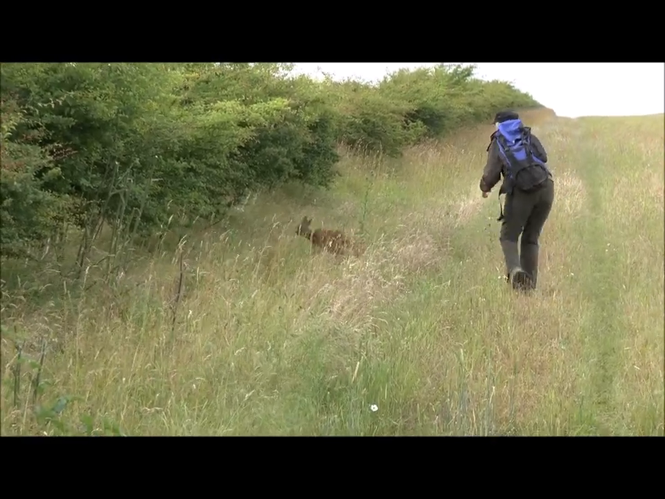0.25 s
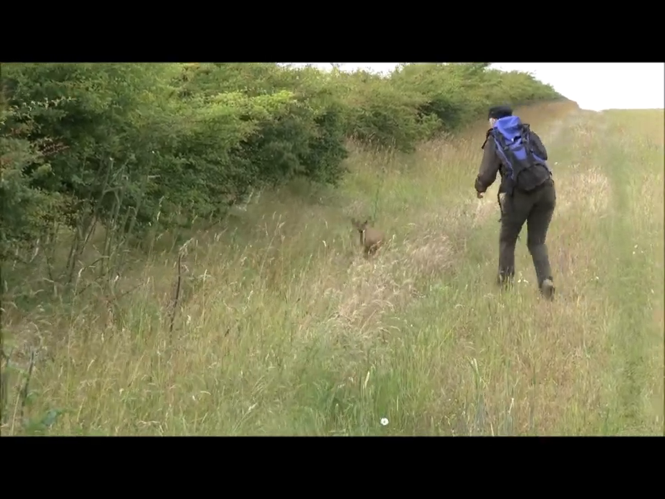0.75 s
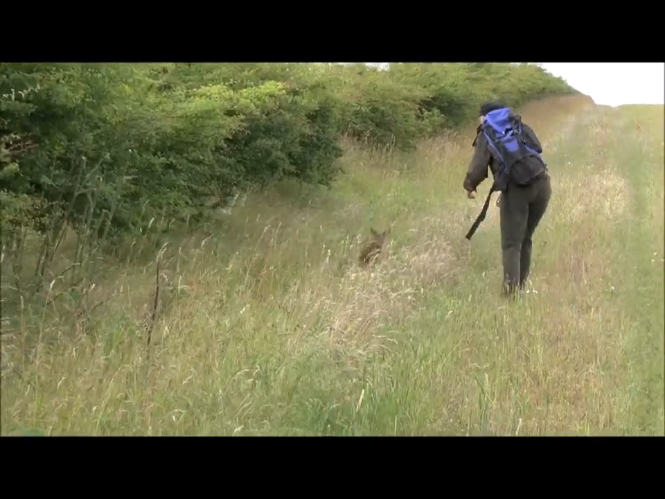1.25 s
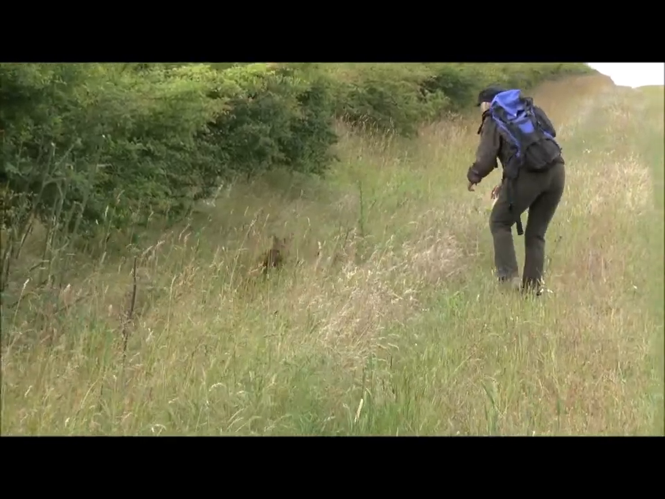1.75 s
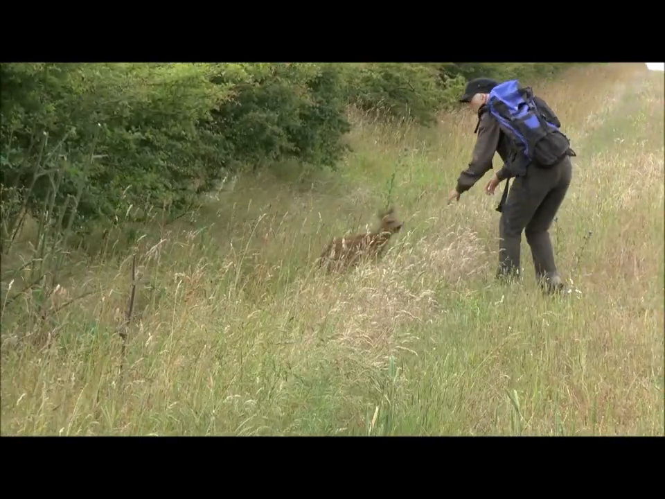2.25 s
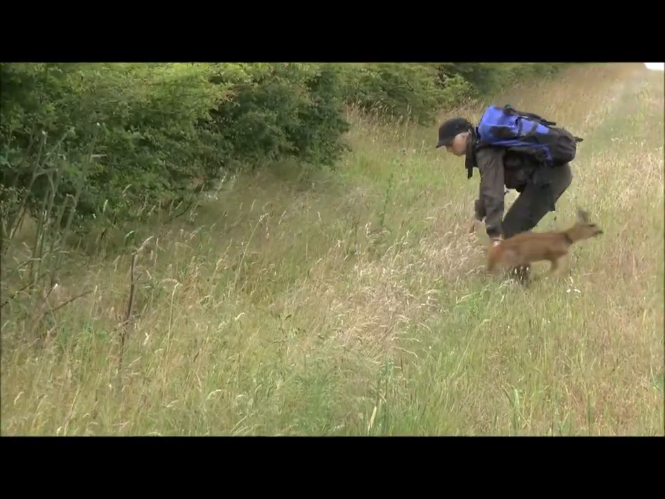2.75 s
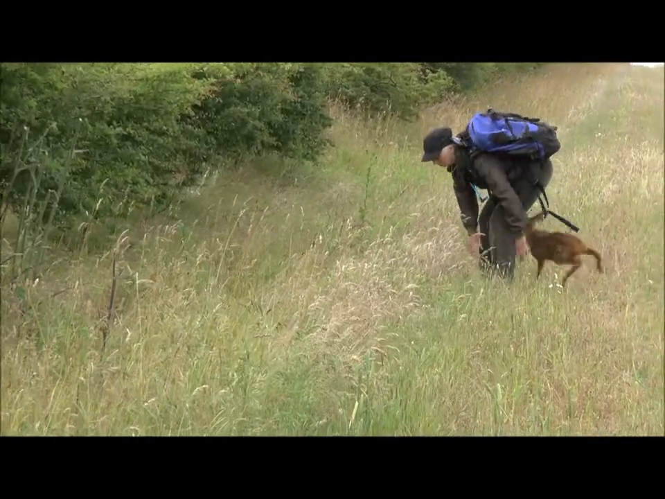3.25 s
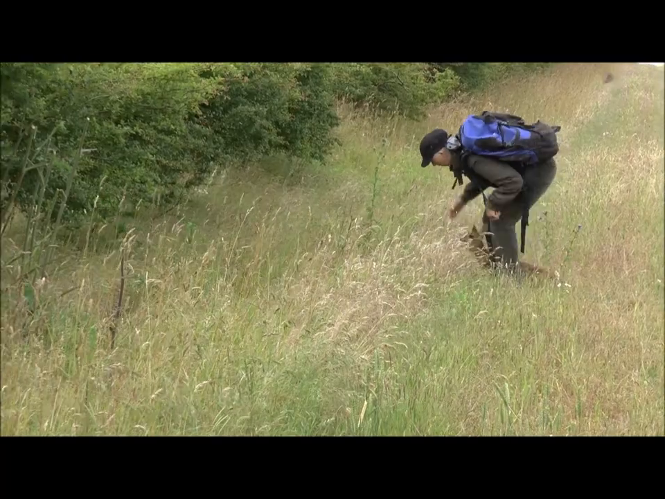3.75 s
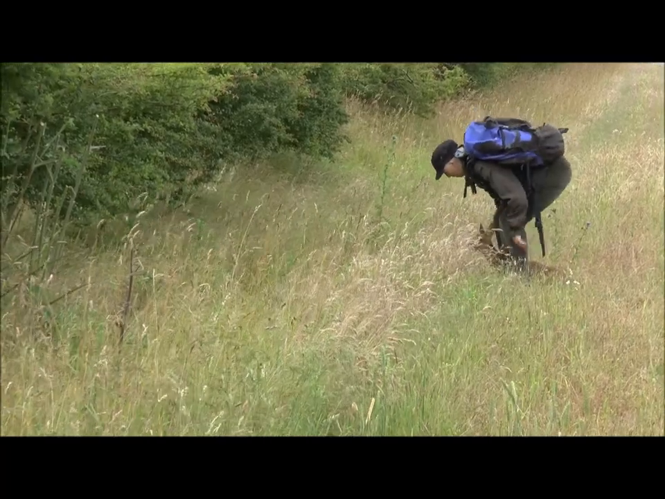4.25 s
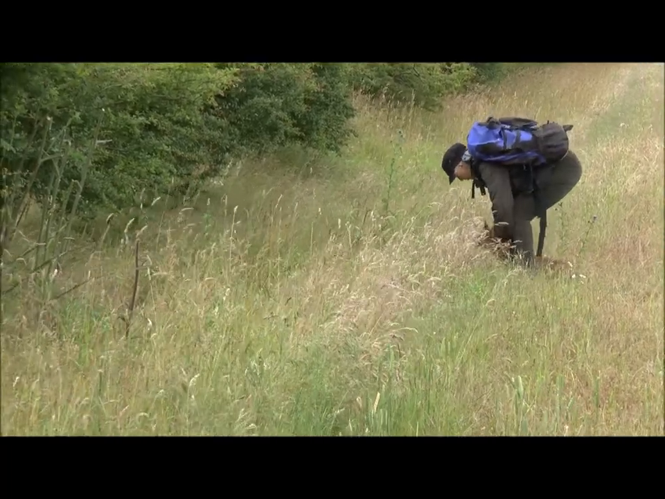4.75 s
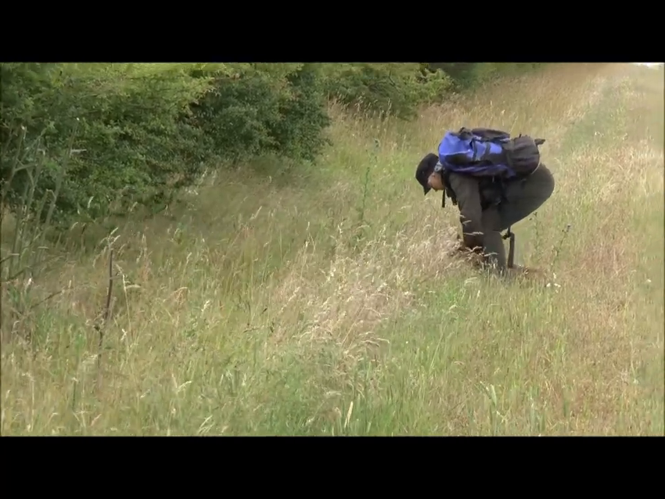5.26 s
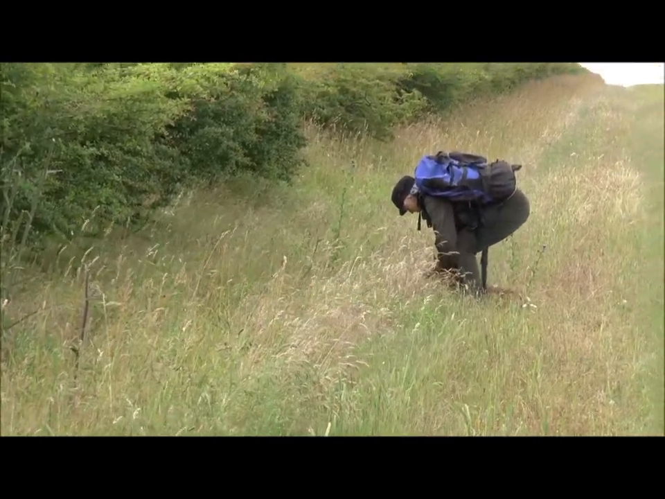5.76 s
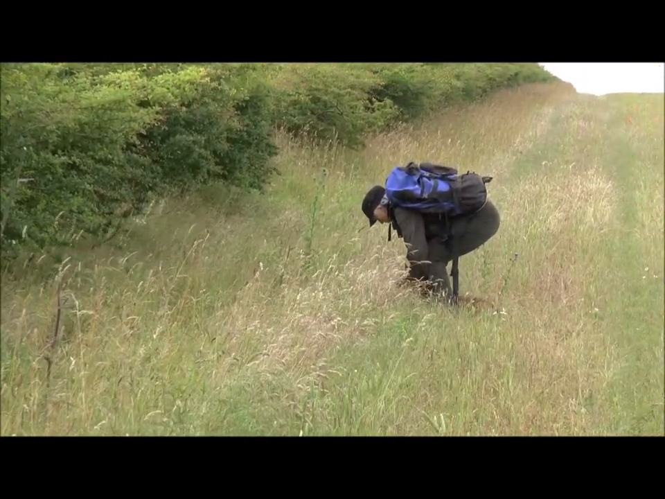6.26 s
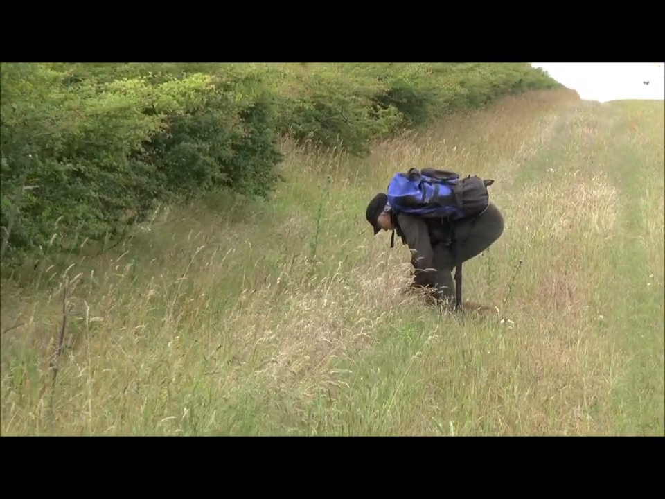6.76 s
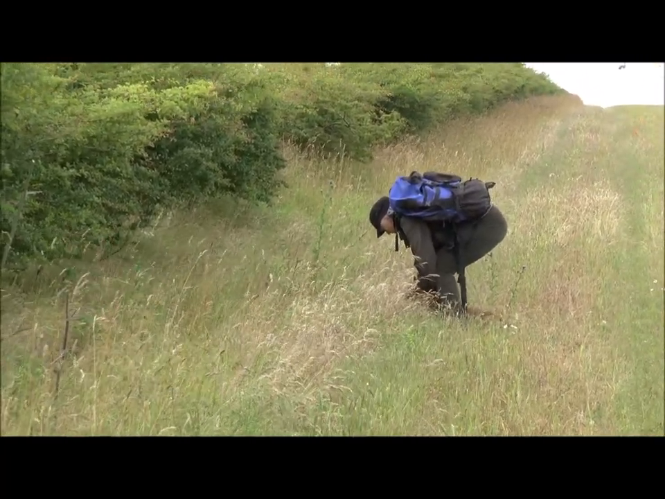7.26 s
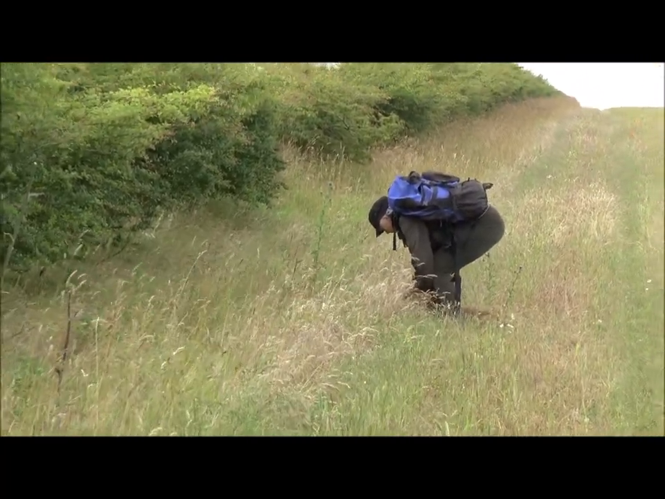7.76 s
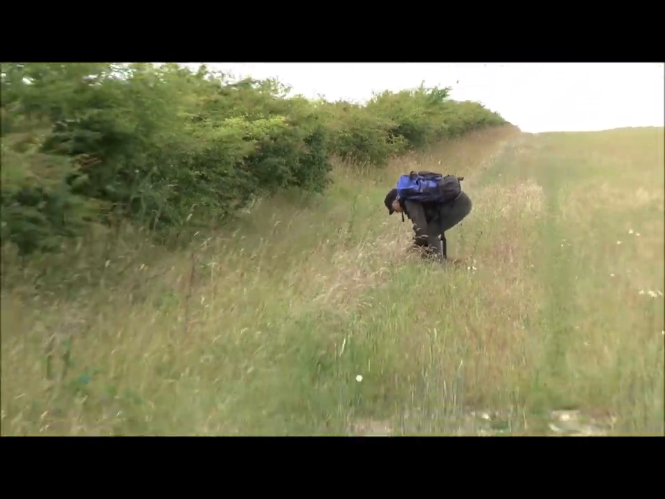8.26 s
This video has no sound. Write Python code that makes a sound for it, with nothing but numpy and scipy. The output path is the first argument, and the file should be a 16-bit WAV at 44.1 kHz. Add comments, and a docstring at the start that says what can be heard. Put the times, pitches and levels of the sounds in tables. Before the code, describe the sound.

A quiet, breezy meadow beside a hedge, heard through a directional microphone with wide low wind buffeting. From 0 to 3 seconds a songbird gives short bending chirps and whistles around 2.5 to 4.5 kHz, while light swishes of steps brush long grass; gusts thump at about 1.2 to 1.4 and a dry stalk snaps loudly at 2.2. Around 3.0 a hare about ten metres away starts with rasping air, and from 3.2 screams: ragged, climbing from 640 to about 1160 Hz by 3.7, cleaner at the top, then collapsing by 3.9. Wind thumps hit at 3.1. Sparse bird notes continue to 4.8, returning at 6.3. From 4.6 to 6.7 come short, hoarse, unvoiced hisses, strongest near 6.0, with a stalk crack at 5.5. Gusts grow harder and spattering from 6.5, a snap ticks at 7.7, and leaves wash louder towards 8.5.

```python
"""Hare screaming in a windy meadow

A snared hare screams once beside a hedge, some ten metres away: voice harmonics follow a pitch arch, with
rasping air around them. The cry starts rough, rises to a clean shriek and collapses. Held down, the hare
hisses hoarsely, made from bursts of shaped noise. Long grass rustles in clouds of clicks and its stalks snap
as ringing cracks. A songbird sings bending sines, hedge leaves and seed heads wash and fizz as filtered
noise, and gusts buffet the microphone as lumpy noise with low thumps and bright spatter."""
import sys
import numpy as np
from scipy import signal
from scipy.fft import rfft, irfft, next_fast_len
from scipy.io import wavfile
from scipy.ndimage import uniform_filter1d

SR = 44100
rng = np.random.default_rng(int(sys.argv[2]) if len(sys.argv) > 2 else 0)


def unload_wav(signal):
    """Save mono or channel-first audio to the path in sys.argv[1] as 16-bit WAV at rate SR, clipped to [-1, 1]."""
    wavfile.write(
        sys.argv[1],
        SR,
        np.round(np.clip(np.atleast_2d(signal).T, -1, 1) * 32767).astype(np.int16),
    )


N = 374850  # length of the scene in samples
EDGE_HZ = 15700  # upper limit of the sound


def amp(db):
    """Turns decibels into a gain."""
    return 10 ** (np.asarray(db) / 20)


def unit(x):
    """Scales a sound to rms 1."""
    return x / np.sqrt(np.mean(x ** 2) + 1e-20)


def read(points, hz):
    """Reads a curve over pitch, with straight lines between points on a log-frequency axis."""
    f, value = np.transpose(points)
    return np.interp(np.log(hz + 1), np.log(f + 1), value)


def curves(rows, t):
    """Reads each column of a time table at the times t."""
    s, *columns = np.transpose(rows)
    return [np.interp(t, s, c) for c in columns]


def add(mix, s, sound):
    """Mixes a sound in, starting at s seconds."""
    part = mix[round(s * SR):][:len(sound)]
    part += sound[:len(part)]


def tint(x, colour):
    """Gives a sound a tone colour by scaling its frequencies, at rms 1."""
    size = next_fast_len(len(x))
    gain = amp(read(colour, np.fft.rfftfreq(size, 1 / SR)))
    return unit(irfft(rfft(x, size) * gain, size)[:len(x)])


def wobble(n, hz):
    """Smooth random motion up to about hz, at rms 1: random points joined and then averaged."""
    step = SR / (2 * hz)
    points = rng.standard_normal(int(n / step) + 4)
    joined = np.interp(np.arange(n) / step, np.arange(len(points)), points)
    return unit(uniform_filter1d(joined, int(step / 2) + 1))


def crackle(per_s, spread_db):
    """Random clicks of uneven size, at rms 1."""
    size = amp(spread_db * np.minimum(rng.exponential(1, N), 4))
    happens = rng.random(N) < per_s / SR
    return unit(size * rng.standard_normal(N) * happens)


def spectra(x):
    """Splits a sound into short-time spectra: Hz as a column, frame times, values."""
    hz, t, z = signal.stft(x, SR, nperseg=1024, noverlap=768)
    return hz[:, None], t, z


def waveform(z):
    """Turns short-time spectra back into sound."""
    return signal.istft(z, SR, nperseg=1024, noverlap=768)[1][..., :N]


def scream(jitter=0.0142, waver=0.0028, shimmer=0.26, smear=0.49, flutter_db=1.85, dull_db=2.4,
           voice_db=3.0, rasp_db=0, pulsing=0.69, rattle=0.13):
    """Vocal folds go from ragged to clean as the pitch arches; air rasps through them in puffs."""
    # pitch of the scream, which climbs, catches once, peaks and collapses: t/s, f/Hz
    cry = [(3.23, 640), (3.3, 693.6), (3.375, 837), (3.41, 890), (3.445, 990), (3.49, 931), (3.55, 1017),
           (3.665, 1133), (3.7, 1137), (3.735, 1165), (3.755, 1146), (3.767, 1076), (3.79, 1034),
           (3.83, 956), (3.87, 650), (3.925, 540)]
    # gain on each harmonic by its pitch: f/Hz, gain/dB
    harmonic_gain = [(400, -30), (550, 1), (720, -4), (930, -21.5), (1150, -13.5), (1380, 2.5), (1580, -17),
                     (1850, -1), (2300, -8), (2600, 7), (3000, 2.5), (4600, 2), (5700, -10), (6700, -25.5),
                     (10300, -23.5), (12000, -41.5), (15000, -35)]
    # how raw the voice is: t/s, level of the rasping air/dB, roughness of the folds (0 is clean)
    rasp = [(3.02, -59.5, 0.36), (3.14, -50, 0.77), (3.17, -40, 1.08), (3.37, -37.5, 0.72),
            (3.51, -44.5, .35), (3.599, -43, 0.3), (3.72, -53, 0), (3.85, -60, 0.32), (3.924, -73, 0.3)]
    # colour of the air through the open mouth: f/Hz, gain/dB
    rasp_colour = [(400, -23), (900, -34), (1400, -26.5), (1650, -32), (2100, -29), (2600, 0.5), (3300, -2),
                   (4300, 9), (5200, 3), (6200, -10), (8000, -16), (10000, -6.5), (15500, -28)]
    top_hz, top_db, effort_db_per_octave = 1146, -28, 23  # the higher the cry, the harder it is pushed
    voice_on_s, voice_off_s = 0.05, 0.017  # the folds start and stop vibrating
    collapse_s, collapse_db = 3.76, -4  # the voice breaks and loses strength
    catch_s, catch_half_s, catch_db = 3.465, 0.06, -4.5  # the voice catches on its way up

    t = np.arange(rasp[0][0], rasp[-1][0], 1 / SR)
    n = len(t)
    hz, = curves(cry, t)
    effort_db = top_db + effort_db_per_octave * np.log2(hz / top_hz)
    effort_db = effort_db + collapse_db * np.clip((t - collapse_s) / 0.0067, 0, 1)
    effort_db = effort_db + catch_db * np.exp(-((t - catch_s) / catch_half_s) ** 2)
    air_db, rough = curves(rasp, t)
    hz = hz * (1 + jitter * rough * wobble(n, 220) + waver * wobble(n, 45.56))
    phase = 2 * np.pi * np.cumsum(hz) / SR

    folds = np.zeros(n)
    for k in range(1, 22):
        # ragged folds lose their upper harmonics: these weaken and smear into noise
        upper = np.clip(k - 2, 0, 8)
        gain_db = read(harmonic_gain, k * hz) - dull_db * rough * upper
        gain_db = gain_db + flutter_db * (0.94 + rough) * wobble(n, 29.92)
        slip = rng.uniform(0, 2 * np.pi) + smear * rough ** 2 * upper * wobble(n, 260)
        folds += amp(gain_db) * np.cos(k * phase + slip) * (k * hz < EDGE_HZ)
    starting = np.clip((t - cry[0][0]) / voice_on_s, 0, 1) ** 2
    stopping = np.clip((t[-1] - t) / voice_off_s, 0, 1)
    folds *= starting * stopping * amp(effort_db + voice_db)
    folds *= 1 + shimmer * rough * wobble(n, 173)

    # the air comes in one puff per swing of the folds
    puffs = rng.standard_normal(n) * (1 + pulsing * np.cos(phase)) * (1 + rattle * wobble(n, 150))
    air = amp(air_db + rasp_db) * through_mouth(puffs, 1 - rough ** 2, rasp_colour)
    return t[0], (folds + air) * signal.windows.tukey(n, 0.02)


def hisses(rattle=0.12, hiss_db=0, uneven_db=1.6):
    """Unvoiced air rattles through the tight throat in short bursts while the mouth opens and shuts."""
    # hoarse hisses: start t/s, length/s, level/dB, swell from start to end/dB
    bursts = [(3.088, 0.057, -46.5, -8), (4.642, 0.13, -61.5, -4), (4.914, 0.19, -53, -15),
              (5.258, .135, -52, -4), (5.516, 0.067, -59.5, 2), (5.587, 0.14, -50.5, 5),
              (5.864, 0.07, -51.5, 3), (5.963, 0.125, -42, 5), (6.245, .065, -63.5, 0),
              (6.328, 0.17, -55, 0), (6.625, 0.074, -60, 0)]
    # colour of a hiss with the mouth open: f/Hz, gain/dB
    hiss_colour = [(700, -59), (1500, -45), (2100, -8.5), (2700, -5), (3350, 6), (4400, 3), (5200, -9.5),
                   (6200, -33), (9000, -36), (15000, -30)]
    out = np.zeros(N)
    for s, length, db, swell_db in bursts:
        n = int(length * SR)
        u = np.linspace(0, 1, n)  # progress through the burst
        opening = np.sqrt(abs(np.sin(np.pi * u)))
        air = through_mouth(rng.standard_normal(n), opening, hiss_colour)
        air = air * (1 + rattle * wobble(n, 167.0))
        level_db = db + hiss_db + swell_db * (u - 0.5) + uneven_db * wobble(n, 39.6)
        add(out, s, air * amp(level_db) * signal.windows.tukey(n, 0.8))
    return out


def through_mouth(air, opening, open_colour):
    """Rushing air is a narrow band while the mouth is nearly shut, and widens as it opens."""
    # colour with the mouth nearly shut: f/Hz, gain/dB
    shut_colour = [(400, -20), (900, -16), (1400, -12.5), (1650, -14), (2100, -9.5), (2600, 3.5),
                   (3100, -8.5), (4300, -14), (5100, -16), (6200, -37), (15500, -37)]
    return (1 - opening) * tint(air, shut_colour) + opening * tint(air, open_colour)


def songbird(waver=0.0093, song_db=0):
    """Each note is a near sine that bends in one of a few shapes."""
    # notes: start t/s, length/s, shape, middle pitch f/Hz, level/dB
    notes = [(.05, 0.058, "arch", 2460, -64), (0.207, 0.082, "rise", 2480, -60),
             (0.424, 0.038, "fall", 2520, -59), (0.461, 0.11, "whistle", 2284, -56.5),
             (0.824, 0.041, "arch", 3480, -56), (.971, 0.045, "arch", 3550, -60),
             (1.04, .15, "whistle", 2500, -63.5), (1.155, 0.041, "arch", 3480, -61),
             (2.046, .035, "fall", 3100, -59), (2.133, 0.036, "fall", 2600, -56.5),
             (2.213, 0.042, "fall", 2670, -58.5), (2.309, .043, "rise", 3190, -55),
             (2.356, .063, "hook", 3060, -52), (2.53, 0.037, "rise", 4300, -62.5),
             (2.583, 0.03, "fall", 3110, -59.5), (2.701, .03, "rise", 4670, -62),
             (2.749, .044, "fall", 3070, -56.5), (2.916, .045, "rise", 4110, -57.5),
             (2.969, .046, "fall", 3010, -50.5), (3.904, 0.088, "arch", 4165, -66),
             (4.14, 0.089, "whistle", 3230, -64), (4.314, 0.056, "arch", 3215, -61),
             (4.476, .105, "hook", 3460, -61), (4.757, 0.039, "arch", 3440, -59.5),
             (6.335, 0.07, "whistle", 4400, -61), (6.362, .05, "whistle", 3630, -61)]
    # shape name: first and last pitch/semitones from the middle of the note
    shapes = {"fall": (2.5, -2.5), "rise": (-1.81, 2.2), "arch": (-.8, -1.8), "whistle": (0.41, 0.16),
              "hook": (2.3, .05)}
    song = np.zeros(N)
    tremble = 1 + waver * wobble(N, 180)
    for s, length, shape, middle_hz, db in notes:
        u = np.linspace(0, 1, int(length * SR))
        first, last = shapes[shape]
        # a parabola through the first, middle and last pitch
        semitones = np.polyval(np.polyfit([0, 0.5, 1], [first, 0, last], 2), u)
        hz = middle_hz * 2 ** (semitones / 12) * tremble[int(s * SR):][:len(u)]
        tone = np.sqrt(2) * np.sin(2 * np.pi * np.cumsum(hz) / SR)
        add(song, s, amp(db + song_db) * tone * signal.windows.tukey(len(u), 0.5))
    return song


def grass(splinter=0.85):
    """Blades brush past legs in clouds of tiny clicks; now and then a dry stalk snaps and rings."""
    # steps and kicks brushing the grass: middle t/s, half length/s, level/dB
    swishes = [(0.454, .02, -59), (0.93, 0.032, -53.5), (1.396, 0.04, -61.5), (1.653, 0.053, -60),
               (2.18, 0.0064, -51.5), (2.56, 0.046, -69), (2.726, .05, -62.5)]
    # colour of the brushing: f/Hz, gain/dB
    swish_colour = [(1000, -18), (2500, 8), (3500, 7.5), (6000, -4.5), (8000, -12), (10000, 1),
                    (15000, -23)]
    # dry stalks snapping: t/s, level/dB, ring f/Hz, decay time constant/s
    snaps = [(1.48, -50, 9300, 0.00082), (2.1871, -28.5, 4270, 0.0018), (5.4657, -36.5, 2900, 0.00075),
             (5.48, -49, 5130, 0.00084), (7.733, -40.5, 5920, 0.0022)]
    # colour of the splintering noise: f/Hz, gain/dB
    snap_colour = [(900, -11), (2000, -8.5), (4200, 0.5), (6500, 1), (9000, -11.5), (15000, -17)]
    time = np.arange(N) / SR
    strokes = sum(amp(db) * np.exp(-((time - s) / half) ** 2) for s, half, db in swishes)
    out = strokes * tint(crackle(per_s=4000, spread_db=1.0), swish_colour)
    t = np.arange(2048) / SR
    for s, db, hz, decay in snaps:
        crack = np.sin(2 * np.pi * hz * t) + splinter * tint(rng.standard_normal(len(t)), snap_colour)
        onset = 1 - np.exp(-t / 0.00022)
        add(out, s, amp(db) * crack * np.exp(-t / decay) * onset)
    return out


def breeze(leaves_db=10.5, heads_db=15.0, grain=0.48, side_db=-26):
    """Hedge leaves give a soft wash, dry seed heads a finer fizz above it."""
    # level over time of the wash and fizz, which sink after the scream and a hard gust:
    # t/s, relative leaves/dB, relative seed heads/dB
    levels = [(0, -62, -73.5), (3.0, -63, -66), (4.0, -69, -72.5), (5.8, -68, -74.5), (6.9, -66, -70.5),
              (7.3, -63.5, -66), (7.45, -70, -72.5), (7.95, -63, -68.5), (8.3, -55.5, -61),
              (8.5, -53, -58.5)]
    # colour of the wash and fizz together: f/Hz, gain/dB
    wash_colour = [(100, 4), (450, 1), (650, 3), (950, -7), (1300, -6), (1900, -1), (3200, -0.5),
                   (4500, -4.5), (6000, -8.5), (7800, -14.5), (8800, -12), (9500, -6), (11500, -11),
                   (15000, -19.5)]
    hz, t, z = spectra(rng.standard_normal(N) + grain * crackle(per_s=1500, spread_db=3.5))
    leaves, heads = curves(levels, t)
    fine = read([(3000, 0.054), (9000, 1)], hz)  # share of the seed heads at each pitch
    level_db = (1 - fine) * (leaves + leaves_db) + fine * (heads + heads_db)
    gain = amp(read(wash_colour, hz) + level_db)
    side = amp(side_db) * waveform(spectra(rng.standard_normal(N))[2] * gain)
    return waveform(z * gain) + np.array([side, -side])


def wind(rumble_db=19, body_db=15.5, flutter_db=1, lumps_db=2.0, lumps_hz=35):
    """Lumpy turbulence, partly different at the two ports; strong gusts reach higher in pitch."""
    # colour of the wind: f/Hz, gain/dB
    wind_colour = [(10, -22), (35, -3.5), (70, 2.5), (110, 6), (220, 3), (300, 3.5), (400, 2.5),
                   (480, -8.5), (580, -6.5), (760, -10.5), (900, -27), (1100, -22.5), (1400, -36),
                   (3000, -50.5), (8000, -67)]
    # how alike left and right are: f/Hz, correlation
    alike = [(25, 0.41), (60, 1), (125, 0.67), (250, 0.86), (500, -0.078), (900, -0.22), (1500, -0.74)]
    # how strongly each pitch follows the rumble: f/Hz, share
    rumble_share = [(30, 1.31), (100, 1.21), (175, 0)]
    hz, t, (common, apart) = spectra(rng.standard_normal((2, N)))
    rumble, body, flutter = airflow(t)
    low = read(rumble_share, hz)
    high = read([(250, 0.0026), (400, 0.98)], hz)  # share of the flutter
    level_db = low * (rumble + rumble_db) + (1 - low - high) * (body + body_db)
    level_db = level_db + high * (flutter + flutter_db)
    gain = amp(read(wind_colour, hz) + level_db)
    same = np.clip(read(alike, hz), -0.9, 1)
    mid = waveform(common * gain)
    side = waveform(apart * gain * np.sqrt((1 - same) / (1 + same)))
    lumps = unit(amp(lumps_db * wobble(N, lumps_hz)))
    return np.array([mid + side, mid - side]) * lumps


def airflow(t):
    """Gusts rise, hold and fall on top of the draught: dB of rumble, body and flutter at the times t."""
    # light air that keeps moving over the microphone: t/s, relative level/dB, brightness/dB
    draught = [(0, -60, 4.5), (.7, -55.5, 0), (1.6, -57.5, -2), (2.15, -59.5, 8), (2.7, -57, -1.5),
               (3.9, -61, -4), (4.55, -61.5, 0.5), (5.6, -52.5, 15), (6.3, -58, 11), (8.5, -52, 9)]
    # gusts; bright ones have less rumble and more flutter:
    # start t/s, length/s, relative level/dB, brightness/dB
    gusts = [(0.225, .06, -58, -1), (0.594, 0.56, -58.5, -3.5), (1.153, 0.059, -43.5, -2),
             (1.286, .07, -44, -2), (1.361, 0.053, -42.5, 5), (1.867, 0.056, -55.5, -6),
             (2.37, .25, -54, -0.5), (2.919, .38, -45.5, 2), (3.09, 0.075, -37, 13),
             (3.438, .07, -44.5, 9.5), (3.52, 0.14, -51, 5), (4.111, 0.083, -48, 2), (4.19, .12, -45, 6.5),
             (4.711, 0.074, -45, 4), (4.843, 0.066, -45.5, 4.5), (5.017, .23, -40.5, 8.5),
             (5.25, 0.39, -42.5, 23.5), (5.622, .16, -47, 17.5), (5.874, .22, -50.5, 12.5),
             (6.392, 0.069, -43.5, 10), (6.515, .13, -42, 14.5), (6.667, 0.19, -36.5, 13.5),
             (6.874, 0.099, -45, 12.5), (7.043, 0.035, -50, 7), (7.268, 0.21, -38, 11.5),
             (7.436, 0.15, -34.5, 16), (7.658, 0.097, -45.5, 14), (7.799, 0.15, -40.5, 13),
             (7.964, 0.075, -39.5, 19.5), (8.05, 0.13, -44, 14), (8.215, 0.12, -33, 22),
             (8.334, .18, -40.5, 21)]
    gust_rise_s, gust_fall_s = 0.025, 0.047  # every gust has the same slopes
    flutter_per_brightness = 0.44  # dB of flutter gained for each dB of rumble lost
    hard_gust_db, flutter_per_excess = -44, 0.47  # above this level, extra flutter in dB for each dB
    flows = [(0.98, *curves(draught, t))]
    for s, length, db, bright_db in gusts:
        edges = np.minimum((t - s) / gust_rise_s, (s + length - t) / gust_fall_s)
        flows.append((np.clip(edges + 0.5, 0, 1), db, bright_db))
    power = np.zeros((3, len(t)))
    for share, db, bright_db in flows:
        excess_db = np.maximum(db - hard_gust_db, 0)
        flutter_db = db + flutter_per_brightness * bright_db + flutter_per_excess * excess_db
        power += [(share * amp(band_db)) ** 2 for band_db in (db - bright_db, db, flutter_db)]
    return 10 * np.log10(power)


def thumps(hz=210, rise=0.0032, thump_db=-3):
    """An eddy strikes each port as a short, heavily damped swing of pressure."""
    # single eddies thumping the microphone: t/s, relative level/dB
    eddies = [(1.153, -31.5), (1.297, -31.5), (1.375, -30), (2.933, -29), (3.089, -26), (3.12, -21.5),
              (5.138, -26), (5.401, -30), (6.764, -24.5), (6.839, -24), (7.278, -23.5), (7.351, -23.5),
              (7.402, -22.5), (7.454, -24.5), (7.515, -27), (7.971, -28), (8.226, -31), (8.31, -24.5)]
    out = np.zeros((2, N))
    t = np.arange(2048) / SR
    pitch_factors = rng.uniform(0.67, 1.464, (len(eddies), 2))  # each port hears its own pitch
    for (s, db), factors in zip(eddies, pitch_factors):
        for port, factor in zip(out, factors):
            swell = t / rise * np.exp(1 - t / rise)
            add(port, s, amp(db + thump_db) * swell * np.sin(2 * np.pi * hz * factor * t))
    return out


def splutter(pressure, splutter_db=3.0):
    """Wind pressure, squared so that hard swings dominate, tears into spatter at each port by itself."""
    # colour of the spatter: f/Hz, gain/dB
    spatter_colour = [(200, -27), (500, -6), (750, 3), (950, -8), (1400, -14), (2500, -11), (6000, -42)]
    return np.array([amp(splutter_db) * port ** 2 * tint(rng.standard_normal(N), spatter_colour)
                     for port in pressure])


def hedge(x):
    """Foliage scatters a faint, short tail: noise that dies away at its own speed at each pitch."""
    # time for the tail to fall by 60 dB: f/Hz, t60/s
    fade_times = [(500, 0.32), (3000, 0.62), (6000, 0.38), (12000, 0.17)]
    hz, t, z = spectra(rng.standard_normal(SR // 2))
    tail = waveform(z * amp(-60 * t / read(fade_times, hz)))
    return signal.fftconvolve(x, tail / np.linalg.norm(tail))[:N]


def hollow(x, depth=0.55):
    """The directional microphone subtracts a delayed copy, which combs distant sound into a hollow tone."""
    delay = 0.00253  # s
    hz = np.fft.rfftfreq(N, 1 / SR)
    share = depth * read([(300, 0.021), (1000, 0.13), (2000, 0.97), (6000, 1), (9000, 0.64), (15000, 0.49)], hz)
    return irfft(rfft(x) * (1 - share * np.exp(-2j * np.pi * hz * delay)), N)


def scene(hare_echo_db=-27, bird_echo_db=-9):
    """Hare, bird and grass lie straight ahead, the breeze is slightly spread and the wind is wide."""
    hare = hisses()
    add(hare, *scream())
    bird = songbird()
    gusts = wind() + thumps()
    echo = hedge(amp(hare_echo_db) * hare + amp(bird_echo_db) * bird)
    return hollow(hare + bird + echo + grass() + breeze()) + gusts + splutter(gusts)


def record(dry):
    """A steep low-pass filter removes everything above the upper limit."""
    low_pass = signal.firwin(511, EDGE_HZ, window=("kaiser", 9), fs=SR)
    return signal.oaconvolve(dry, low_pass[None], "same")


dry = scene()
out = record(dry)
unload_wav(out)
```